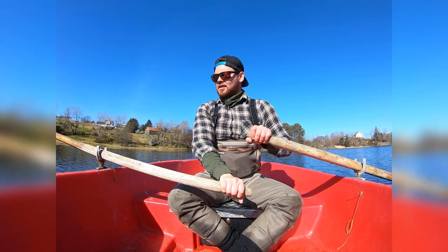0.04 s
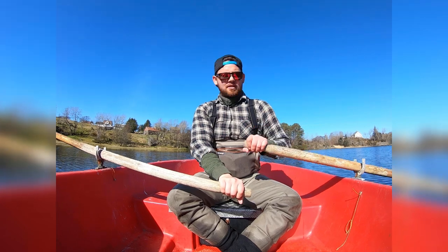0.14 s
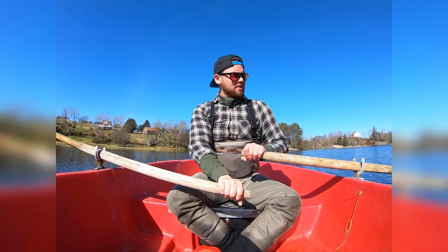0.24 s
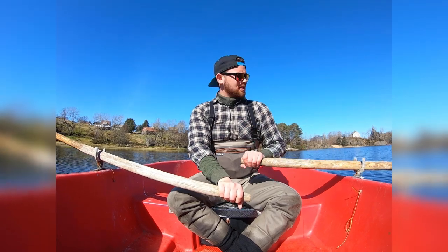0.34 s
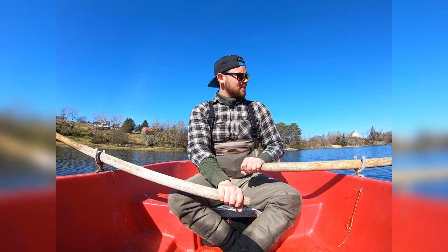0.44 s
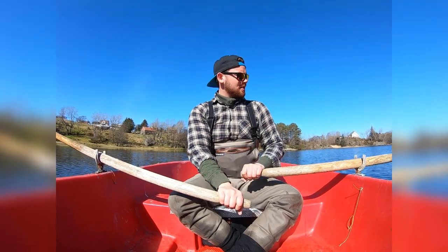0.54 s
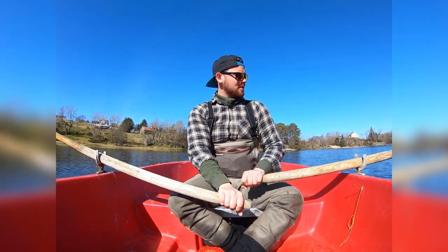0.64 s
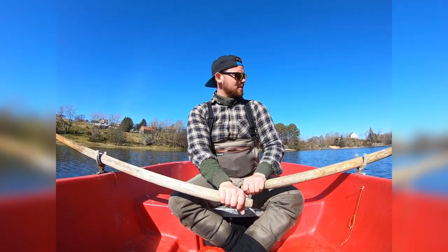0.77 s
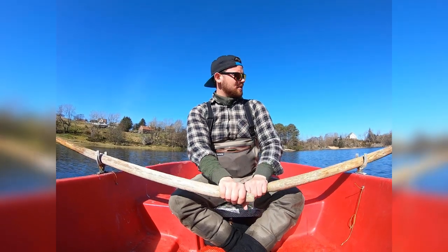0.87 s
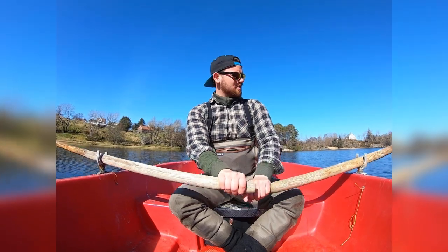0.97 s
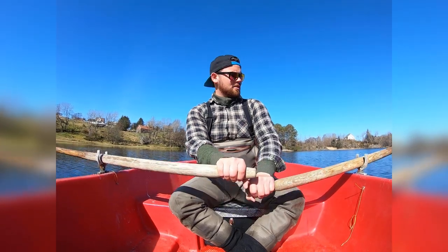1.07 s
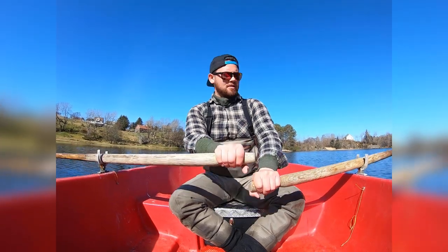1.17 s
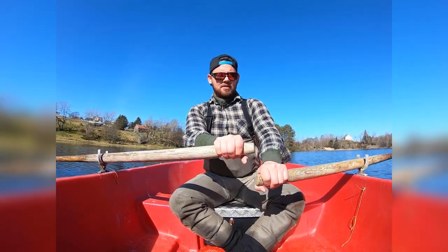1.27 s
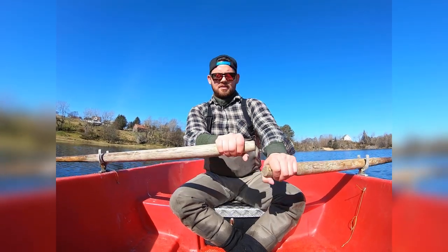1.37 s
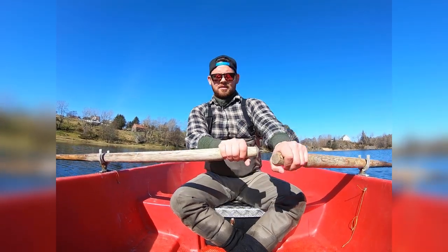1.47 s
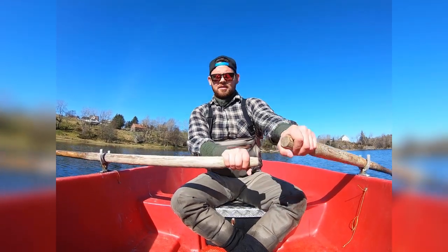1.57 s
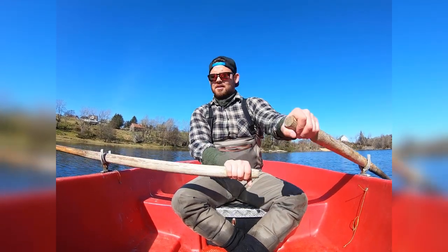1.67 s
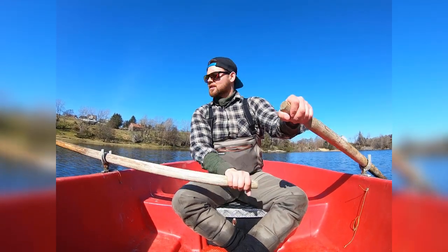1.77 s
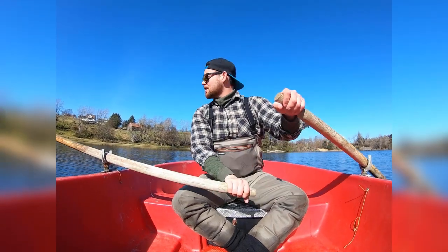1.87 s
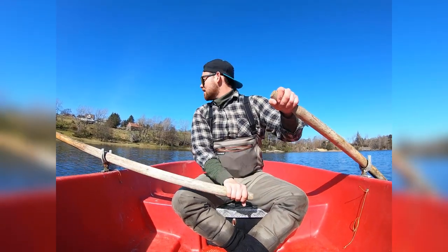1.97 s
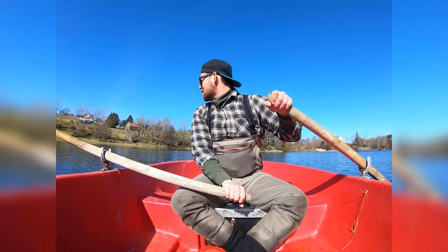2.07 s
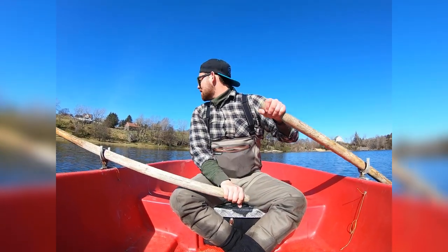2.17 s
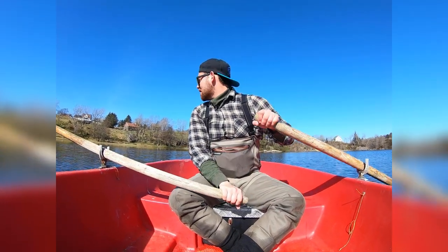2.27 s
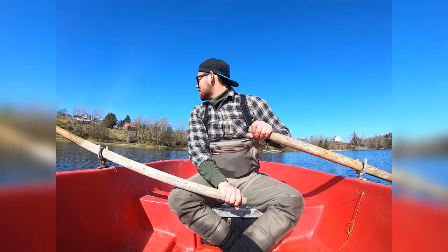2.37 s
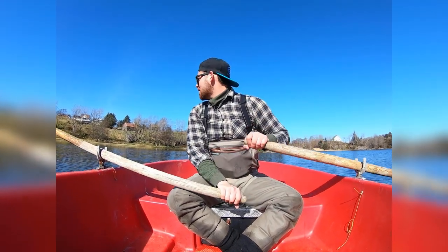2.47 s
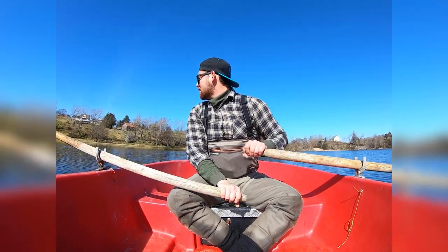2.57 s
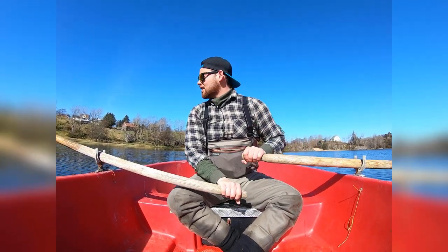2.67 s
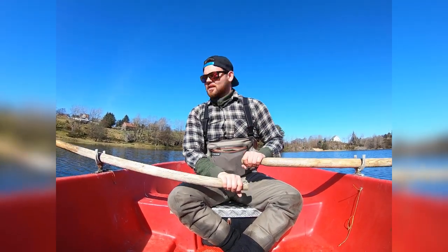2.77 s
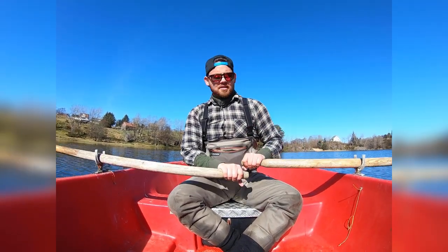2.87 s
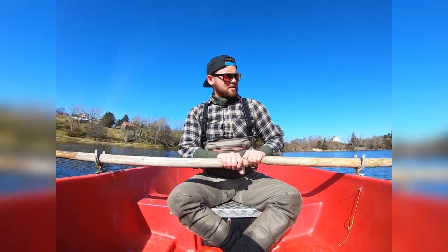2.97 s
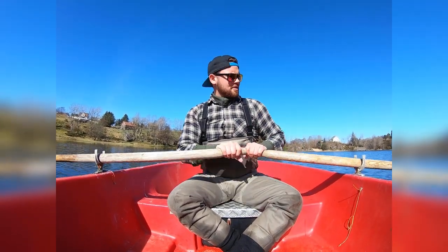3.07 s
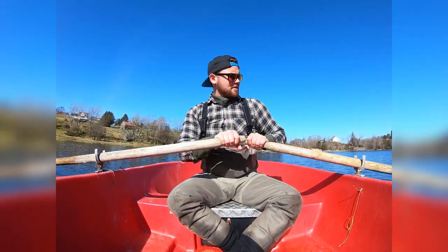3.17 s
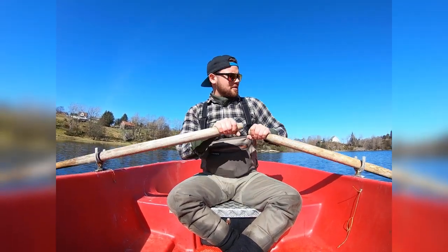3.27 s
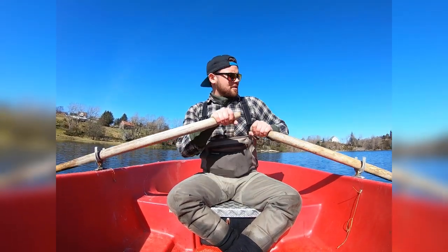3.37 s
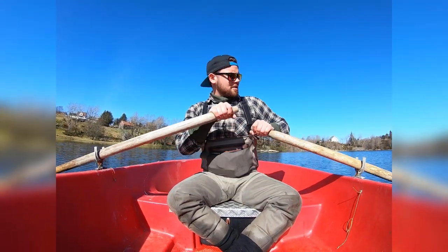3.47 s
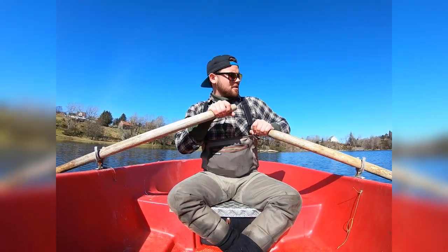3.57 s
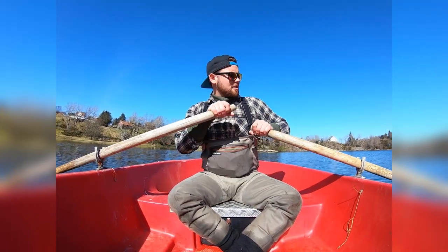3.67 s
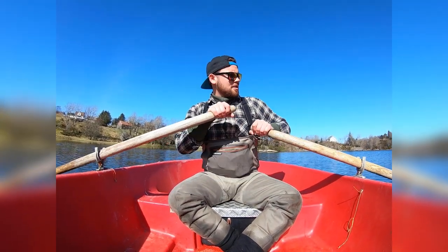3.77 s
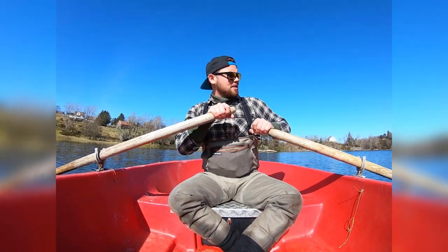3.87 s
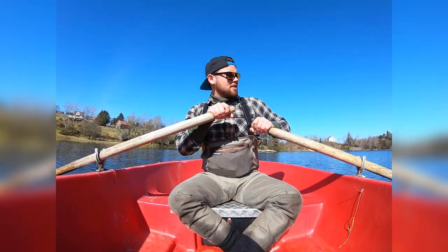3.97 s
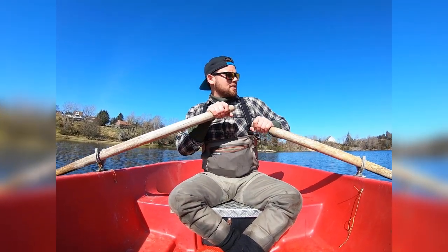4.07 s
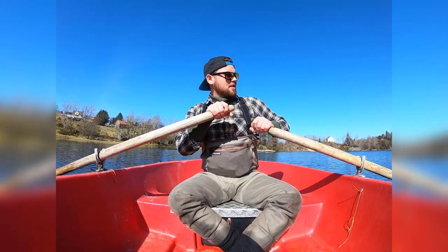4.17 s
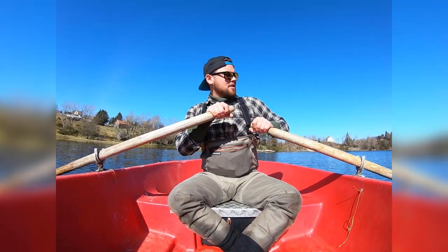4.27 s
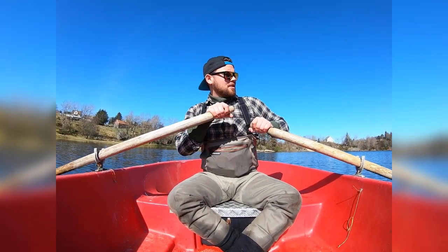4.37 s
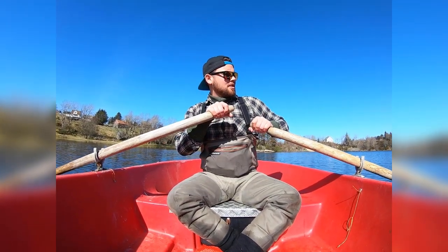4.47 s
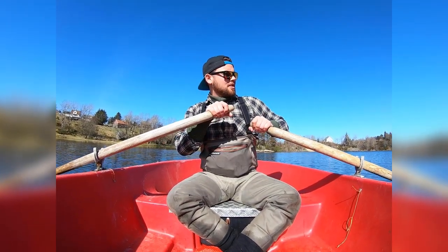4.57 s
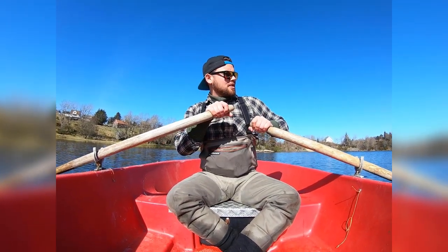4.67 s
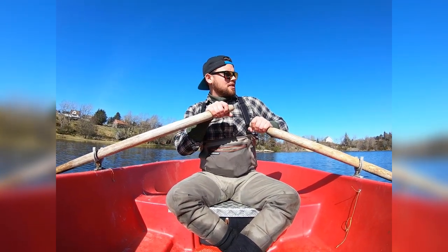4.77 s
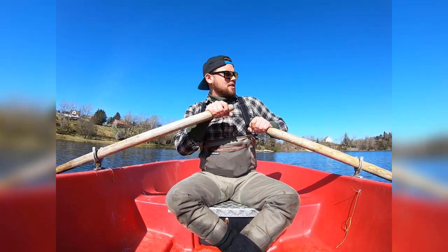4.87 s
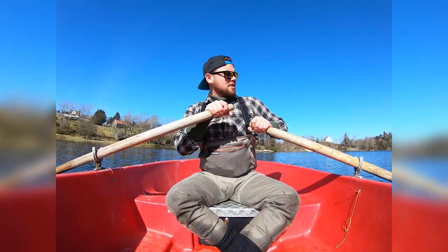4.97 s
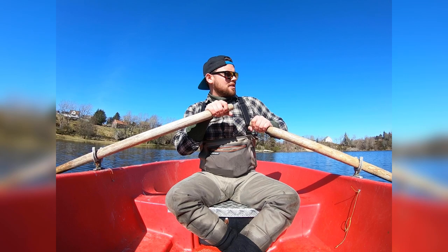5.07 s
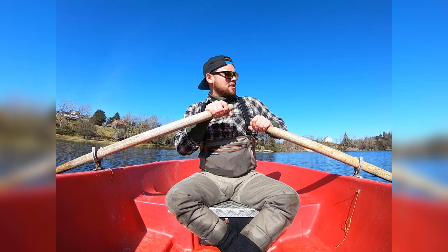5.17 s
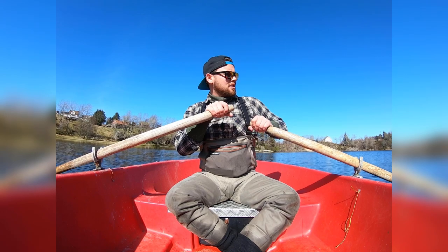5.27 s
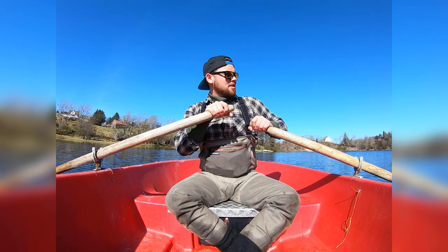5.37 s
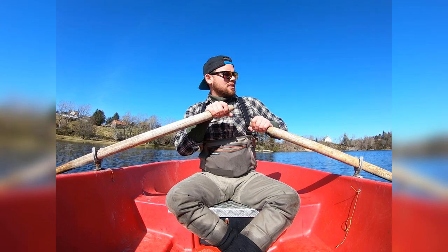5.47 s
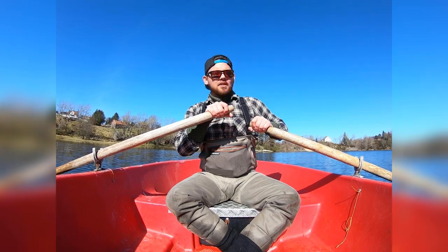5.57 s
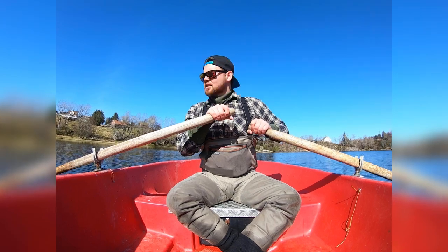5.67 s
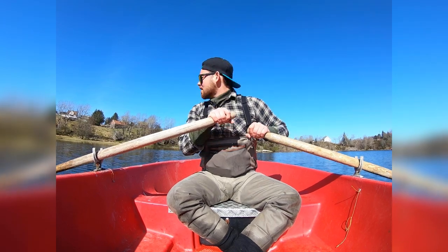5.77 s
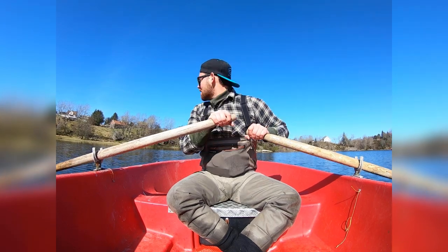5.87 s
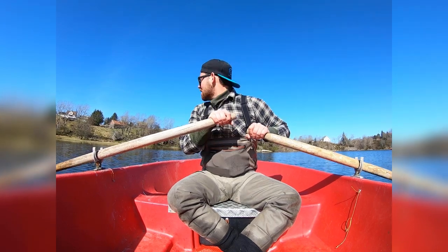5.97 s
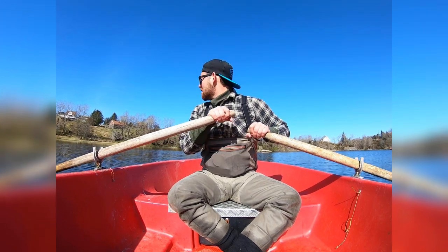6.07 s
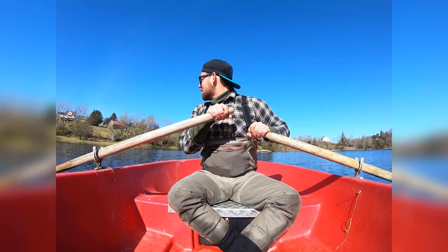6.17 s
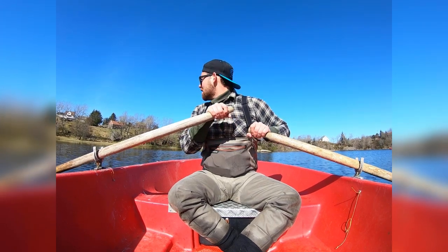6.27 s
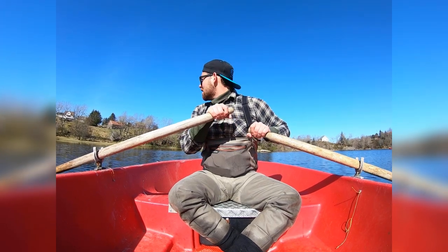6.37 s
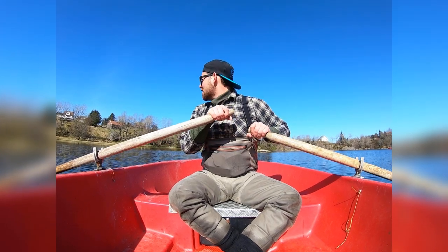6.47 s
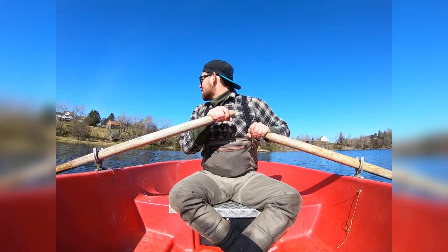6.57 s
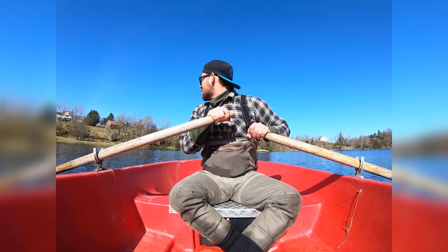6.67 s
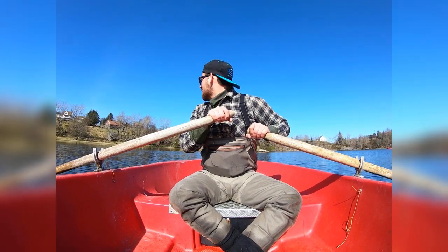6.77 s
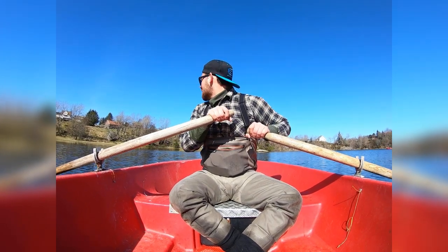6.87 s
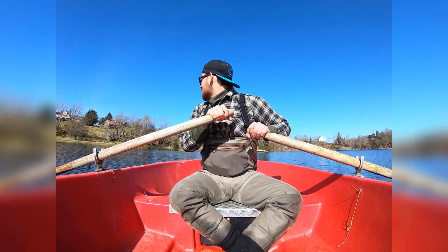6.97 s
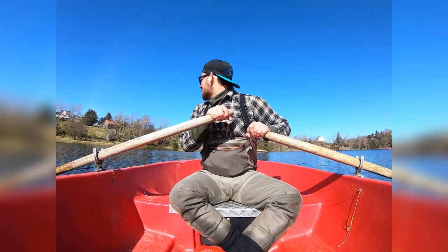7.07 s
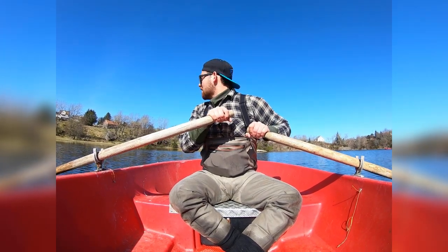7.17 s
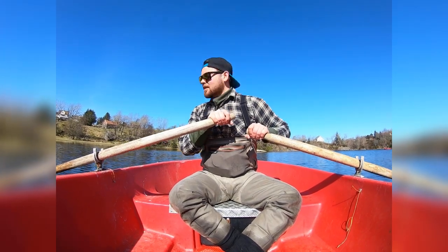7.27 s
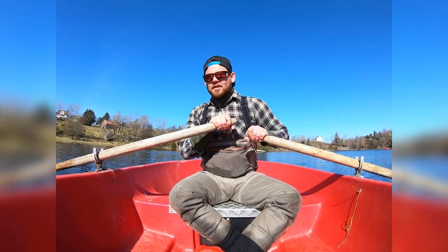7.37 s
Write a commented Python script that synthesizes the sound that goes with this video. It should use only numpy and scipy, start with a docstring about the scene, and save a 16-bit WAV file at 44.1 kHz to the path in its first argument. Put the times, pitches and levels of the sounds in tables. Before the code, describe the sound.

Inside a small plastic rowboat on a calm lake, close and wide, with dry short reflections from the hull and very quiet open air. At about 0.2 to 0.7 s an oar dips with bubbling water, a hollow gulp and high drips, mostly to the left. It settles to a trickle while a faint distant bird whistles around 0.9, 1.4 and 1.9 s. A second dip gulps at 1.7 s; a very light oar tick follows at 2.2 s. From 2.4 to 3.1 s water churns and the hull rumbles deeply. The strongest stroke comes at 3.3 to 4 s: a booming gulp, splashy spray and a cluster of bright plinks on both sides. Dribbling thins through 5 s, with isolated drips and a soft gulp near 5.8 s. Cloth rustles faintly at 5.9 and 6.8 s, the bird returns at 6.7 and 7.1 s, and oars knock dully at 7.0 to 7.2 s.

```python
"""Rowboat on a calm lake

Heard from inside a small plastic boat: oar strokes stir up swarms of ringing bubbles over rushing noise and fine spray.
Drips and gulps are single gliding bubbles, gurgles are ragged swept tones, and oar knocks are banks of ringing modes.
Rumble and slosh swell as the oars shove the hull; filtered noise makes the rower's swishing clothes and the lake air.
A songbird on the shore repeats its gliding whistles."""
import sys
import numpy as np
from scipy import signal
from scipy.fft import rfft, irfft, next_fast_len
from scipy.io import wavfile
from scipy.ndimage import map_coordinates

SR = 44100
rng = np.random.default_rng(int(sys.argv[2]) if len(sys.argv) > 2 else 0)


def store_pcm(level_fs):
    """Save levels as 16-bit WAV."""
    pcm = np.round(np.clip(level_fs, -1, 1) * 32767).astype(np.int16)
    wavfile.write(sys.argv[1], SR, np.atleast_2d(pcm).T)


N = 327486  # length in samples

# In every table, pan_db is the left level minus the right.
# a blade moving through the water or dribbling above it:
# start_s, entry_s, length_s, churn_db, spray_db, spray_change_db (over the stroke), churn_pan_db
BLADE_STROKES = [(0.227, 0.055, 0.32, -45.5, -61, 5.5, -11), (1.737, 0.18, 0.2, -50, -52.5, -14, -3.5),
                 (2.408, 0.19, 0.42, -49.5, -64.5, 7.5, -9.5), (2.796, 0.041, 0.32, -69, -62, -7, -10),
                 (3.292, 0.06, 0.093, -69, -49.5, -9.5, -7), (3.456, 0.055, 0.3, -42.5, -48.5, 0.5, -3.5),
                 (3.765, 0.072, 0.14, -42, -72, -11, 3.5), (3.909, 0.038, 1.25, -48, -58, -17, -0.5),
                 (5.188, 0.11, 0.89, -65, -67, -28, 0)]
# single drips and bubbles: start_s, level_db, pitch_hz, pan_db
DRIP_EVENTS = [(.252, -35, 641, -11), (.289, -32.5, 626, -6), (.291, -33, 1420, -15),
               (0.478, -30.5, 1680, -24), (0.515, -33, 1263, 4), (.573, -31.5, 1570, -21),
               (1.718, -45.5, 984, -15.5), (1.798, -42, 1090, -4), (1.815, -43, 2120, -13),
               (1.098, -46, 1780, -12), (1.866, -39.5, 688, -7), (2.701, -34.5, 1450, -26),
               (2.841, -43.5, 735, -11), (3.372, -33, 1904, -17), (3.471, -25, 1570, -20),
               (3.554, -24.5, 2270, 29), (3.629, -26.5, 2650, 25), (3.639, -26.5, 1496, 9),
               (3.71, -27, 1600, -25), (3.742, -34.5, 1320, -13), (3.797, -32.5, 1230, -16),
               (3.937, -26.5, 1844, 20), (4.01, -37.5, 650, -9), (4.027, -24, 1213, -18),
               (4.296, -34, 561, -8), (4.604, -34.5, 1970, -11), (4.731, -37, 1430, -20),
               (5.121, -42, 1296, 8), (5.354, -42.5, 1240, -13), (5.961, -34, 685, -8.5),
               (6.02, -43, 2270, -17)]
# air pockets closing behind a blade, booming in the hull: start_s, level_db, pitch_hz
GULP_EVENTS = [(0.432, -21.5, 191.2), (0.447, -30.5, 274.6), (0.612, -46, 309), (1.688, -19, 193),
               (2.46, -35.5, 186), (2.694, -26, 148.6), (3.02, -21, 95.5), (3.5, -25.5, 200.6),
               (3.54, -13, 193.5), (5.818, -33, 193.2)]
# the hollow a moving blade drags open, and the gliding swirls it leaves:
# start_s, end_s, first_hz, last_hz, level_db
GURGLE_EVENTS = [(0.236, 0.256, 926, 750, -45.5), (0.311, 0.422, 422, 532, -36),
                 (0.649, 0.66, 1380, 2500, -46), (0.835, 0.855, 1460, 1910, -53),
                 (0.974, 0.987, 636, 1920, -48.5), (2.456, 2.527, 1604, 1910, -49),
                 (2.529, 2.627, 887, 1085, -46), (2.741, 2.775, 1286, 1780, -42.5),
                 (4.125, 4.209, 376, 459, -48), (4.754, 4.806, 734, 1080, -48.5),
                 (5.005, 5.085, 438, 745, -49), (5.255, 5.296, 605, 850, -48.5),
                 (5.506, 5.525, 1120, 1470, -48.5), (5.73, 5.889, 287.7, 164.9, -47)]
# oars knocking in their locks: start_s, level_db (before the bounce levels), favoured_hz
KNOCK_EVENTS = [(2.217, -43.5, 308), (2.279, -55, 455), (7.021, -36.5, 274), (7.039, -35, 150),
                (7.05, -41.5, 242), (7.096, -41.5, 136), (7.203, -44.5, 1190), (7.207, -50.5, 330)]
# sharp spatters of thrown water: start_s, level_db (before the tone filter)
SPATTER_EVENTS = [(0.45, -37), (.477, -33.5), (.535, -38), (0.627, -35), (2.781, -38), (3.49, -35.5),
                  (5.685, -44.5), (6.873, -42.5)]
# modes of oar and hull ringing together: mode_hz, level_db, t60_s
OAR_MODES = [(136.7, 10, 0.06), (237.7, 0.5, 0.11), (322.2, -2, 0.099), (430, -11.5, 0.13),
             (977, -0.5, 0.012), (1346, 7, 0.013), (1564, -4.5, 0.085), (1730, -2, 0.043)]
# the bird's calls: start_s, low_note_db, high_note_db
BIRD_CALLS = [(.925, -72, -67), (1.388, -62, -67), (1.872, -58, -63), (6.655, -64, -62), (7.132, -59, -61)]
# sleeves and collar rubbing: middle_s, half_length_s, level_db
CLOTH_SWISHES = [(2.086, 0.73, -65.5), (5.88, 0.12, -56.5), (6.848, 0.11, -57.5)]
# the oars shove the boat and water works against the hull: start_s, length_s, rumble_db, slosh_db
HULL_SHOVES = [(0.413, 0.091, -44.5, -34.5), (1.656, 0.48, -40, -46), (2.487, 0.27, -33.5, -33.5),
               (2.812, 0.32, -29, -46.5), (2.987, 0.1, -25, -37.5), (3.329, 0.14, -40, -41),
               (3.48, 0.2, -32, -32), (3.921, 0.61, -43, -53.5), (4.63, 0.77, -55, -85)]

# tone of bubbling water: frequency_hz, relative_db (per Hz)
CHURN_SPECTRUM = [(200, 9), (400, -4.5), (650, 3), (900, -4), (1400, 1), (2000, -4), (3000, -15),
                  (5500, -31.5)]
# tone of fine spray: frequency_hz, relative_db (per Hz)
SPRAY_SPECTRUM = [(1100, 3), (2000, 5), (3000, 2), (4000, 1.5), (5200, -5.5), (7500, -3), (9300, -10.5),
                  (11000, -49), (14500, -70)]
# tone of the boat's low rumble: frequency_hz, relative_db (per Hz)
RUMBLE_SPECTRUM = [(15, -27.5), (30, -0.5), (55, 3), (90, -3.5), (125, -13.5), (200, -50.5)]
# tone of water sloshing under the hull: frequency_hz, relative_db (per Hz)
SLOSH_SPECTRUM = [(80, -23), (130, 4.5), (195, 5.5), (260, -13.5), (400, -19), (600, -40)]
# tone of rubbing cloth: frequency_hz, relative_db (per Hz)
CLOTH_SPECTRUM = [(300, 11), (4000, 7), (6500, -2), (9000, -4.5), (11500, -18.5), (14500, -33)]
# tone of the open lake air: frequency_hz, relative_db (per Hz)
AIR_SPECTRUM = [(25, 4.5), (45, -27.5), (115, -10.5), (195, -3.5), (260, -17), (480, -28.5), (780, -15.5),
                (1150, -24.5), (2600, -34.5), (7500, -38), (14500, -57)]

TOP_HZ = 14500
CHURN_SAG_DB = 10.5  # the bubbles thin out by this much in the course of a stroke
CHURN_T60_S, SPRAY_T60_S = 0.15, 0.52  # how the water settles afterwards
LAP_DB, FIZZ_DB = -83, -82  # floors for churn and spray: ripples that never stop
CHURN_CLUMP_DB, SPRAY_CLUMP_DB = 3, 4.5  # water falls back in clumps, up to this much louder or softer
SHOVE_RISE_S, SHOVE_T60_S = 0.047, 0.42
RUMBLE_SAG_DB, SLOSH_SAG_DB = 3.5, 10.5  # loss in the course of a shove
DRIFT_DB, DRIFT_DB_PER_S = -66, -0.92  # floor for the rumble: the drifting boat, slowly dying away
DRIP_T60_S, DRIP_GLIDE = 0.066, 0.52  # at 1 kHz: ring, and greatest glide over it as a share of pitch
RAGGED_S = 0.26  # the longer a hollow lasts compared with this, the more ragged its pitch
SPRAY_LAG_S = 7e-5  # spray reaches the right channel this much after the left
NEAR_LEAD_S = 2e-4  # drips, gulps and knocks reach the right channel this much before the left


def amp(db):
    """Decibels to linear gain."""
    return 10 ** (np.asarray(db) / 20)


def unit(x):
    """Scale to rms 1."""
    return x / np.sqrt(np.mean(x ** 2) + 1e-20)


def along(points, hz):
    """Gain along (Hz, dB) points on a log axis, falling away beyond the ends."""
    f, db = np.transpose(points)
    inside = np.interp(np.log(hz + 1), np.log(f), db)
    treble_fall = 1 + (hz / f[-1] / 2) ** 10
    bass_fall = np.minimum(hz / f[0], 1) ** 2
    return amp(inside) / treble_fall * bass_fall


def wobble(rate, size=N):
    """A smooth random curve, rate knots a second."""
    knots = rng.standard_normal(int(size * rate / SR) + 4)
    return map_coordinates(knots, [np.arange(size) * rate / SR])


def filtered(x, response):
    """x shaped by a response given as a function of frequency."""
    m = next_fast_len(N + SR // 2)
    spectrum = rfft(x, m) * response(np.fft.rfftfreq(m, 1 / SR))
    return irfft(spectrum, m)[..., :N]


def noise(spectrum):
    """Unrelated coloured noise in both channels, rms 1."""
    return unit(filtered(rng.standard_normal((2, N)), lambda hz: along(spectrum, hz)))


def panned(pan_db):
    """Left and right gains of constant power."""
    gains = amp(np.array([pan_db, -pan_db]).reshape(2, -1) / 2)
    return gains / np.sqrt(np.mean(gains ** 2, axis=0))


def lagged(x, lag_s):
    """The right channel arrives lag_s after the left."""
    right = filtered(x[1], lambda hz: np.exp(-2j * np.pi * hz * lag_s))
    return np.array([x[0], right])


def add(out, s, sound):
    """Mix a sound into out from time s on."""
    part = out[..., max(round(s * SR), 0):][..., :sound.shape[-1]]
    part += sound[..., :part.shape[-1]]


def reflections(x, t60):
    """Surfaces around a source scatter a short, different answer to each side."""
    t = np.arange(SR // 6) / SR
    tail = rng.standard_normal((2, len(t))) * amp(-60 * t / t60) * (t > .001)
    tail /= np.linalg.norm(tail, axis=1, keepdims=True)
    wet = signal.fftconvolve(x, tail, axes=1)[:, :N]
    return filtered(wet, lambda hz: hz ** 2 / (hz ** 2 + 380 ** 2))  # thin the bass


def gesture(start, rise_s, length_s, change_db, t60):
    """Gain that rises, changes by change_db over its length, then dies away."""
    t = np.arange(N) / SR - start
    held_db = change_db * np.clip(t / length_s, 0, 1)
    decay_db = -60 * np.maximum(t - length_s, 0) / t60
    return np.clip(t / rise_s, 0, 1) * amp(held_db + decay_db)


def bubble(t, hz, t60, rise, attack):
    """A pocket of air rings and decays; a positive rise sends its pitch up as it nears the surface."""
    tone = np.sin(2 * np.pi * hz * t * (1 + rise * t / t60 / 2))
    return tone * amp(-60 * t / t60) * (1 - np.exp(-t / attack))


def swarm(spectrum, low_hz, high_hz, rate, cycles, rise, scatter_db, width_db):
    """Random bubbles of all sizes, rate a second, each at its own place; stereo, rms 1."""
    when, size, loud, place, life = rng.random((int(rate * N / SR), 5)).T
    hz = low_hz * (high_hz / low_hz) ** size
    t60 = cycles * (.5 + life) / hz
    gain = along(spectrum, hz) * hz * amp(scatter_db * loud ** 2)
    # lay the rings end to end: which bubble each sample belongs to, and its age
    length = (t60 * SR / 2).astype(int) + 1
    which = np.repeat(np.arange(len(hz)), length)
    age = np.arange(len(which)) - (np.cumsum(length) - length)[which]
    rings = bubble(age / SR, hz[which], t60[which], rise * life[which], .5 / hz[which])
    rings *= gain[which]
    at = (when * N).astype(int)[which] + age
    sides = panned(width_db * (2 * place - 1))
    return unit(np.array([np.bincount(at, rings * side[which], N)[:N] for side in sides]))


def lake_air():
    """The open lake is steady coloured noise whose level wavers slightly."""
    return amp(-61.5 + 0.28 * wobble(3.0)) * noise(AIR_SPECTRUM)


def whistle(length, first_hz, last_hz, arch_hz):
    """One gliding, arched bird note, flickering on its way over the water."""
    u = np.linspace(0, 1, int(length * SR))
    arch = np.sin(np.pi * u).clip(0)
    glide_hz = first_hz + (last_hz - first_hz) * u + arch_hz * arch
    hz = glide_hz + 20 * wobble(200, size=len(u))
    flicker = amp(1.2 * wobble(45, size=len(u)))
    return arch * flicker * np.sin(2 * np.pi * np.cumsum(hz) / SR)


def bird():
    """A short arched whistle, a downward flick, then a longer high note, all gliding tones."""
    out = np.zeros(N)
    for s, low_db, high_db in BIRD_CALLS:
        add(out, s, amp(low_db) * whistle(.068, 3610, 3560, 110))
        add(out, s + .155, amp(high_db) * whistle(.018, 4400, 4150, 0))
        add(out, s + .16, amp(high_db) * whistle(.155, 4410, 4330, 30))
    # the trees on the shore blur the whistle
    return out + amp(-14.5) * reflections(out[None], t60=0.18)


def clothes():
    """Cloth slides over cloth: coloured noise in smooth swells."""
    t = np.arange(N) / SR
    swell = sum(amp(db) * np.exp(-((t - s) / half) ** 2) for s, half, db in CLOTH_SWISHES)
    return swell * noise(CLOTH_SPECTRUM) * panned(-2.5)


def heave():
    """With each shove the boat rumbles unevenly, and large slow pockets of water slosh under the hull."""
    shaken = amp(DRIFT_DB + DRIFT_DB_PER_S * np.arange(N) / SR)
    sloshed = 0
    for start, length, rumble_db, slosh_db in HULL_SHOVES:
        shake = gesture(start, SHOVE_RISE_S, length, -RUMBLE_SAG_DB, SHOVE_T60_S)
        surge = gesture(start, SHOVE_RISE_S, length, -SLOSH_SAG_DB, SHOVE_T60_S)
        shaken = np.hypot(shaken, amp(rumble_db) * shake)
        sloshed = np.hypot(sloshed, amp(slosh_db) * surge)
    uneven = amp(9.9 * np.tanh([wobble(21), wobble(25)]))
    rumble = unit(noise(RUMBLE_SPECTRUM) * uneven)
    slosh = swarm(SLOSH_SPECTRUM, 120.16, 410.6, rate=110, cycles=44, rise=0.026,
                  scatter_db=9.0, width_db=16.5)
    return shaken * rumble * panned(2.4) + sloshed * slosh


def knocks():
    """An oar chatters in its lock; the hardness of the contact picks which modes ring most."""
    out, t = np.zeros((2, N)), np.arange(SR // 3) / SR
    hz, mode_db, t60 = np.transpose(OAR_MODES)[..., None]
    for s, db, favoured_hz in KNOCK_EVENTS:
        for delay_s, bounce_db in [(0, 9), (.008, -20), (.019, 4.5)]:
            octaves_off = np.abs(np.log2(hz / favoured_hz))
            gains = amp(mode_db - 13.0 * octaves_off + rng.normal(0, 1.5, hz.shape))
            detuned_hz = hz * rng.normal(1, 0.043, hz.shape)
            ring = (gains * bubble(t, detuned_hz, t60, rise=0, attack=1 / hz)).sum(0)
            ring /= np.abs(ring).max()
            add(out, s + delay_s, amp(db + bounce_db) * ring * panned(-4.0))
    return out


def gulps():
    """Big air pockets boom, each waking the hull's lowest note."""
    out, t = np.zeros(N), np.arange(SR // 2) / SR
    hull = amp(-12.5) * bubble(t, hz=125.4, t60=0.32, rise=0, attack=0.0094)
    for s, db, hz in GULP_EVENTS:
        boom = bubble(t, hz, t60=0.16, rise=-0.048, attack=0.0042)
        boom += amp(-21.0) * bubble(t, hz * 1.4, t60=0.22, rise=0.1, attack=0.026)
        # the pocket trembles as it collapses, so the boom dies unevenly
        add(out, s, amp(db + 3 * wobble(100, size=len(t))) * (boom + hull))
    return out * panned(-1.2)


def gurgles():
    """The hollow behind a blade sings a fluttering glide, more ragged the longer it stays open."""
    hollows = np.zeros(N)
    for start, end, first_hz, last_hz, db in GURGLE_EVENTS:
        u = np.linspace(0, 1, max(int((end - start) * SR), 2))
        ragged = 1 + ((end - start) / RAGGED_S) ** 2 * wobble(279.7, size=len(u))
        hz = first_hz * (last_hz / first_hz) ** u * ragged
        flutter = unit(amp(3.0 * wobble(86.0, size=len(u))))
        swell = np.sqrt(4 * u * (1 - u))
        add(hollows, start, amp(db) * swell * flutter * np.sin(2 * np.pi * np.cumsum(hz) / SR))
    return hollows * panned(-3.5)


def drips():
    """Single drips ring as bubbles that plink upward in pitch, big ones ringing longer."""
    out, t = np.zeros((2, N)), np.arange(SR // 4) / SR
    for s, db, hz, pan_db in DRIP_EVENTS:
        size = 1000 / hz  # relative to a 1 kHz bubble
        t60 = DRIP_T60_S * size ** 1.24
        glide = DRIP_GLIDE * rng.random() / size
        plink = bubble(t, hz, t60, rise=glide, attack=1.8 / hz)
        # the same impact traps a smaller bubble beside the main one
        small_hz = hz * rng.uniform(1.027, 1.54)
        plink += amp(-1.5) * bubble(t, small_hz, t60 * 0.29, rise=glide, attack=1 / hz)
        add(out, s, amp(db) * plink * panned(pan_db))
    return out


def spatters():
    """Thrown water lands with a bare tick: a very short burst of filtered noise."""
    ticks, t = np.zeros((2, N)), np.arange(SR // 4) / SR
    for s, db in SPATTER_EVENTS:
        add(ticks, s, amp(db) * rng.standard_normal((2, len(t))) * np.exp(-t / 0.0012))
    tone = [(1200, -1), (3600, 9.5), (8000, -1.5), (11500, -24.0)]  # Hz, dB
    return panned(-3.5) * filtered(ticks, lambda hz: along(tone, hz))


def wash():
    """Each stroke raises clumps of gliding bubbles on a soft rush, and fine spray rains back."""
    stirred, thrown = amp(LAP_DB) * panned(0), amp(FIZZ_DB)
    for start, entry, length, churn_db, spray_db, spray_change_db, pan_db in BLADE_STROKES:
        stir = gesture(start, entry, length, -CHURN_SAG_DB, CHURN_T60_S)
        throw = gesture(start, entry, length, spray_change_db, SPRAY_T60_S)
        stirred = np.hypot(stirred, amp(churn_db) * stir * panned(pan_db))
        thrown = np.hypot(thrown, amp(spray_db) * throw)
    bubbles = swarm(CHURN_SPECTRUM, 320, 4800, rate=1400, cycles=64, rise=.35,
                    scatter_db=14, width_db=14)
    droplets = swarm(SPRAY_SPECTRUM, 1800, 10500, rate=900, cycles=18, rise=.15,
                     scatter_db=28, width_db=8)
    clumps = np.tanh(wobble(30))
    churn = bubbles + amp(-7.0) * noise(CHURN_SPECTRUM)
    churn = stirred * amp(CHURN_CLUMP_DB * clumps) * churn
    spray = droplets + amp(-2.5) * noise(SPRAY_SPECTRUM)
    spray = thrown * amp(SPRAY_CLUMP_DB * clumps) * spray
    soft_spray = filtered(spray, lambda hz: 1 / (1 + (hz / 11300) ** 10))
    return churn + panned(-6.0) * lagged(soft_spray, SPRAY_LAG_S)


def scene():
    """Water and oars echo inside the boat; the open lake air lies behind everything."""
    background = lake_air() + bird() + clothes() + heave()
    single_events = knocks() + gulps() + gurgles() + drips() + spatters()
    near = lagged(single_events, -NEAR_LEAD_S) + wash()
    return background + near + amp(-3.5) * reflections(near, t60=0.048)


def record(dry):
    """Keep only what lies below the band limit."""
    return filtered(dry, lambda hz: hz < TOP_HZ)


dry = scene()
out = record(dry)
store_pcm(out)
```